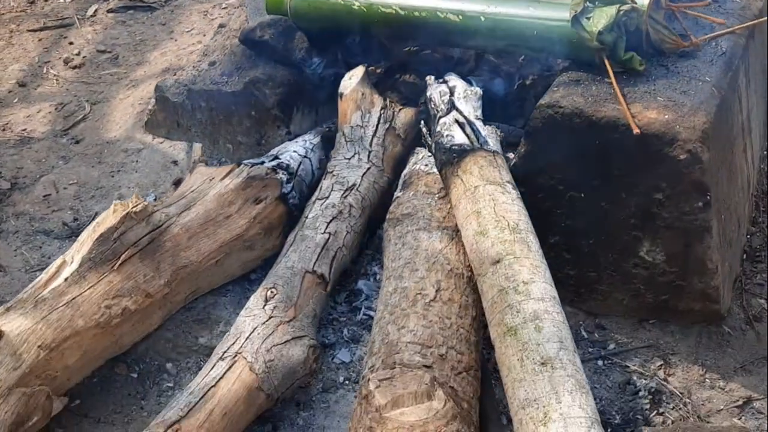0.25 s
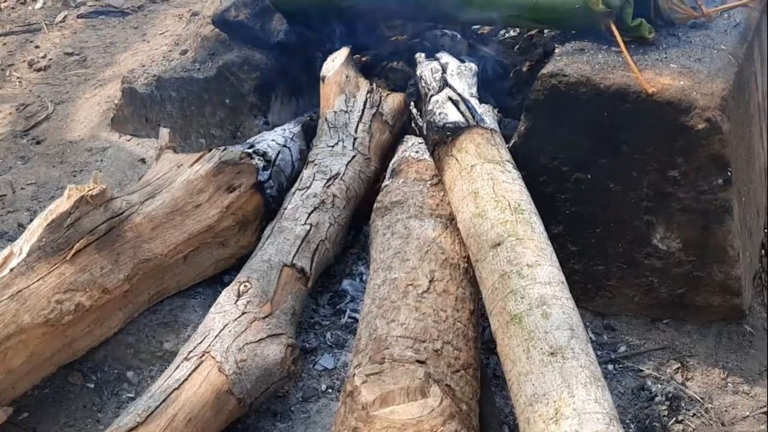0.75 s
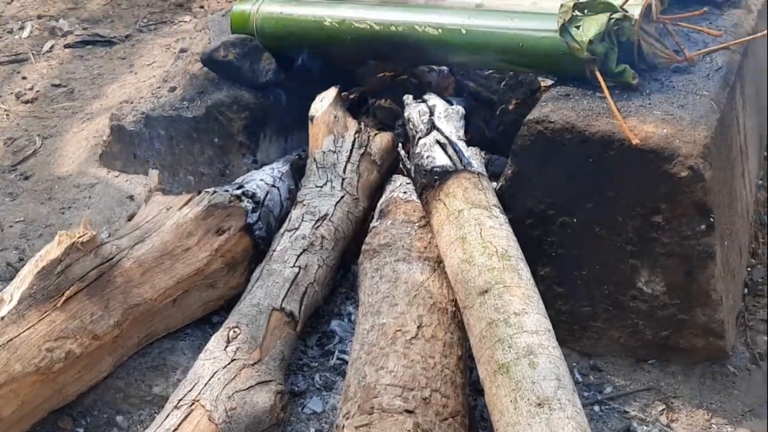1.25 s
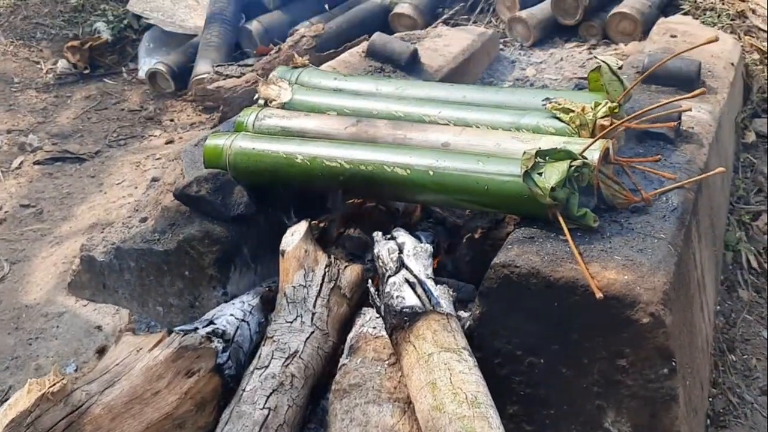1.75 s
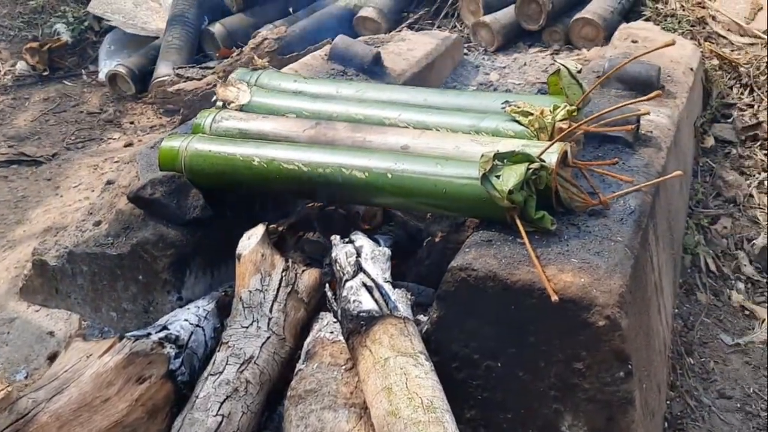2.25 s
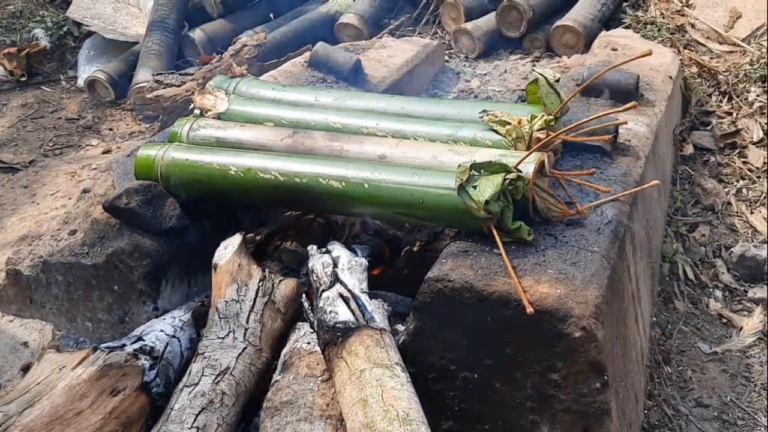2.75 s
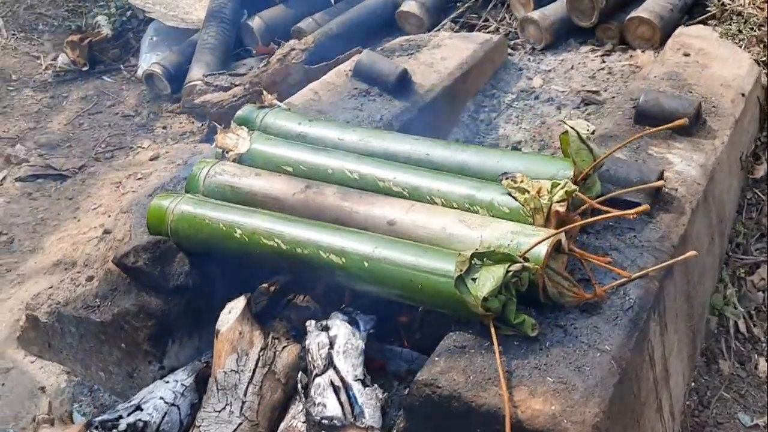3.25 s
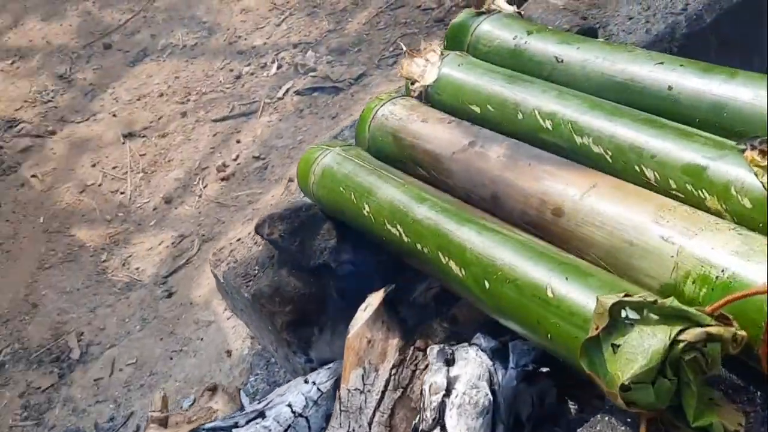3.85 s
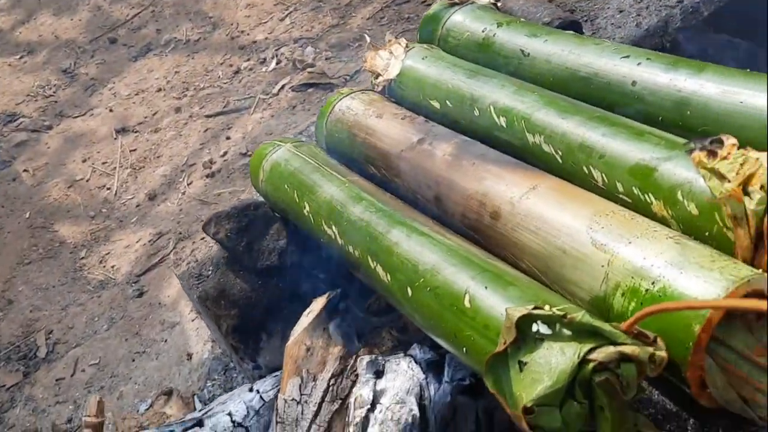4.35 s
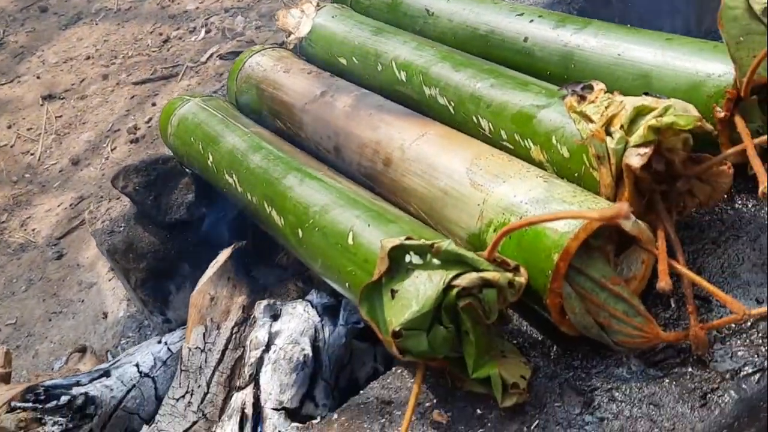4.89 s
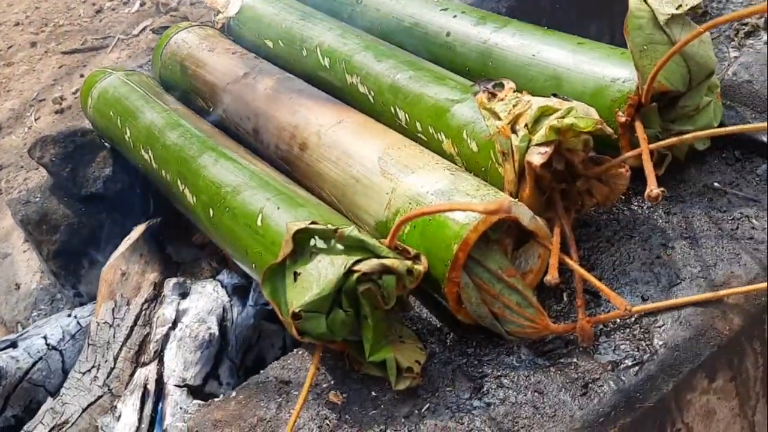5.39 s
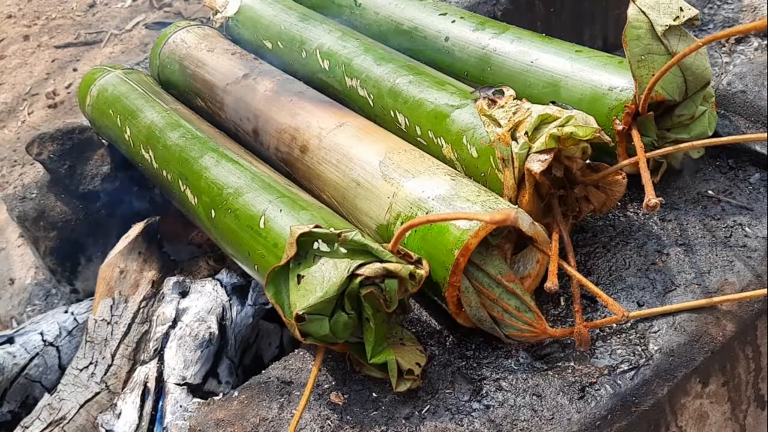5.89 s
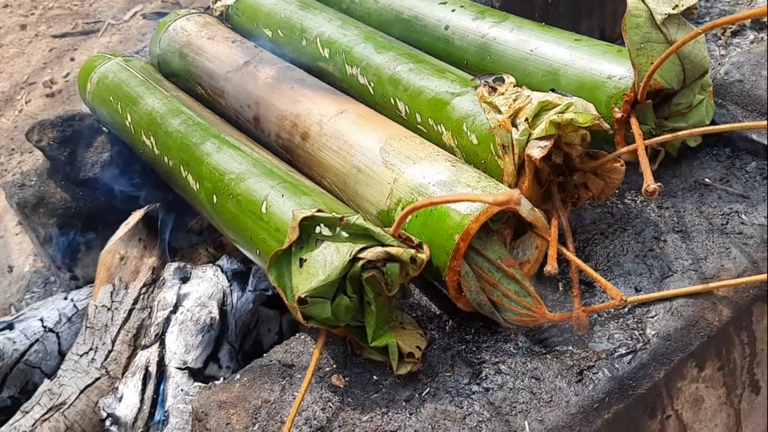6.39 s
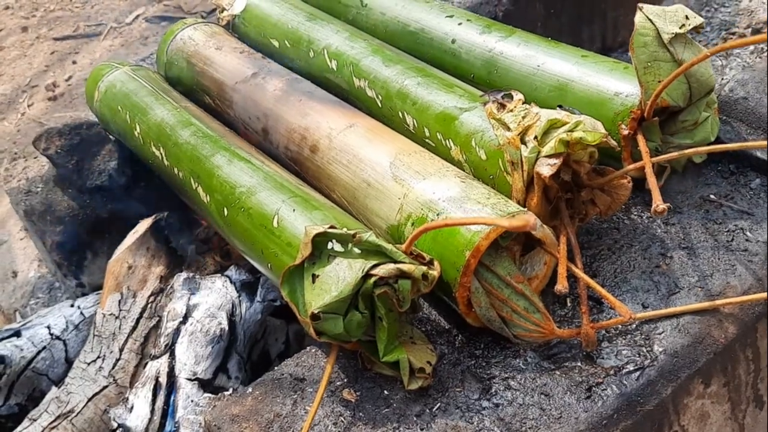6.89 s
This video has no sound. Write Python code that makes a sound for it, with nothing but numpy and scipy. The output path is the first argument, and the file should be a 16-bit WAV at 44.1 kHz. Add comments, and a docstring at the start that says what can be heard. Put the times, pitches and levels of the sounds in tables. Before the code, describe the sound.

Stuffed green bamboo tubes roast over a wood fire outdoors, heard through a hand-held stereo microphone. From the start, juice sizzles and a steam leak hisses, thin and high, a little weaker at first, spurting stronger around 0.6 s and 1.1 s. Low wind flutters bump the right side between 0.2 and 1.5 s, while a far engine chugs very faintly. Soft, nearly buried log pops come near 1.0, 1.9 and 2.6 s. Gusts return at 2.8 s and buffet the right hard around 3.0-3.2 s. A shoe scuffs and thuds dully on dirt at 3.2 s, then gives a sharper gritty knock, more to the left, at 3.4 s. As the microphone moves in, the hiss changes colour, the jet dipping around 4.3 s, then becomes broad, sputtering and steady. A faint hollow rush of flames swells near 5.5 s; the sizzle continues to the end at 7.1 s.

```python
"""Juice sizzles and steam hisses from a leak in stuffed green bamboo tubes, roasting over a wood fire outdoors.
The hand-held two-port microphone moves in close after three seconds, as a shoe scuffs and thuds on dirt.
Gusts buffet its right port, logs pop softly, flames rush and an engine chugs far away.
Hiss and rush are shaped noise, the gusts slow noise and single swings, the knocks and engine struck resonances,
and the pops, thuds and one far tone are shaped sines."""
import sys
import numpy as np
from scipy import signal
from scipy.fft import rfft, irfft
from scipy.io import wavfile
from scipy.ndimage import uniform_filter1d

SR = 44100
rng = np.random.default_rng(int(sys.argv[2]) if len(sys.argv) > 2 else 0)


def file_out(sig):
    """Save sig as 16-bit WAV at sys.argv[1]."""
    # one column per channel
    cols = np.atleast_2d(sig).T
    # limit, then scale
    lim = np.clip(cols, -1, 1)
    pcm = np.round(lim * 32767).astype(np.int16)
    wavfile.write(sys.argv[1], SR, pcm)


N = 314433
TIME = np.arange(N) / SR  # s
FRAME = 512  # samples per spectral frame of the hiss
PORT_GAP_M, SOUND_M_S = .14, 343

# In all tables the half length or width of a hump is where it has fallen to 1/e.

# place between two hiss colours, 0 as from a step away, 1 as close by; the opening, from higher
# and farther off, has a mixed colour: (time [s], closeness of colour [0-1])
CLOSENESS = [(0, .46), (.45, .11), (1.2, .06), (1.5, .01), (3.05, .01), (3.3, .45), (3.65, .6), (4, .73),
             (4.35, .87), (4.75, .97), (5.4, 1), (7.13, .98)]
# the tubes lie to the right as the microphone swings past: (time [s], bearing [degrees])
BEARING = [(0, 7.5), (.7, 6), (1.2, 4), (1.8, .5), (3.1, 0), (3.3, 9), (3.6, 14), (3.85, 24), (4.05, 25),
           (4.42, 23), (4.58, 11), (4.85, 6), (5.3, 1.5), (7.13, 2)]

# how strongly the juice sizzles: (time [s], relative level [dB])
SIZZLE = [(0, -10.5), (.15, -8), (.6, -2.5), (1.05, -2.5), (1.6, -.5), (3.15, -0.2), (3.35, -2.5),
          (3.75, -2.5), (4.15, 0), (7.13, -1)]
# basic hiss at each port, gliding with closeness:
# (far frequency [Hz], far density [dB per Hz], near frequency [Hz], near density [dB per Hz])
HISS_LEFT = [(900, -103.5, 850, -102), (1250, -100, 1250, -81), (1570, -84.5, 1550, -75.7),
             (1780, -87.5, 2200, -77.3), (2130, -97.5, 3100, -84.5), (2360, -86.3, 3800, -80),
             (3400, -85.5, 5100, -74.6), (4650, -89.8, 5900, -72.2), (5050, -92, 7150, -79),
             (6100, -76.5, 7550, -75.3), (7550, -66.6, 7950, -72), (8700, -88.5, 8900, -83),
             (11000, -94.9, 10600, -97.2), (12500, -80.4, 12800, -78.5), (14400, -87.7, 14700, -87.3),
             (15800, -85.6, 15800, -81.2)]
HISS_RIGHT = [(900, -103.8, 900, -101.9), (1330, -105.9, 1150, -97), (1850, -86, 1430, -85.3),
              (2450, -83.2, 2100, -81.8), (3600, -85.7, 3500, -81.7), (4400, -87.2, 4400, -82),
              (6400, -89, 6400, -81.8), (7700, -82.3, 7700, -80.5), (9400, -89.3, 9000, -81.1),
              (12000, -80.9, 12000, -78.4), (14000, -82.6, 14000, -79.2), (15800, -81.5, 15800, -82.3)]
# how alike the ports hear the hiss:
# (frequency [Hz], far likeness [0-1], near likeness [0-1], far lag of the left port [radians])
LIKENESS = [(1000, .6, .68, 0), (1380, .2, .7, .9), (1650, .65, .65, 1.1), (2000, .5, .62, 1.4),
            (2150, .2, .6, .6), (2450, .6, .68, 0), (3150, .68, .95, 0), (3550, .68, .78, 0),
            (3950, .68, .42, 0), (4400, .55, .28, .6), (4900, .4, .18, .5), (5100, .1, .17, -1.2),
            (5400, .4, .15, -1.7), (5800, .35, .12, -1.2), (6250, .4, .1, 1.2), (7500, .6, .1, 1.1),
            (9000, .25, .05, 1), (12000, .05, 0, 0)]
# the leak spurts or chokes for a moment:
# (time [s], half length [s], steam jet [dB], fine spray [dB], spray left minus right [dB])
SURGES = [(0.08, 0.14, 1.5, 0, -4), (0.28, 0.073, 0.5, -3.5, 2), (0.575, 0.24, 6, 3.5, -8),
          (1.104, 0.208, 2.5, -6.5, 0), (2.242, 0.1, 0, 5.5, 1), (3.11, 0.19, 0.2, -4.5, 2),
          (4.278, 0.28, -9.5, 3.5, 0.5)]
# pitch of the jet from a step away, its width, and the pitch above which the spray sounds
JET_FAR_HZ, JET_WIDTH_HZ, SPRAY_HZ = 7650, 800, 8800
# the jet blows a beam that the microphone crosses halfway in; place and width in closeness
BEAM_DB, BEAM_AT, BEAM_WIDTH = 4, 0.52, 0.37
SPRAY_FAR_DB, SPRAY_NEAR_DB, SPRAY_PAN_DB = -0.5, 0.75, 0.3
# colour of hiss arriving fully from the side: (frequency [Hz], left [dB], right [dB])
SIDE_ON = [(1000, 6, 3), (1350, 6.5, 3), (2060, 2.5, -3.5), (2620, 10, 6.5), (3430, 5.5, 5),
           (4600, -7.5, 1), (4960, -5, 3.5), (5700, -1, 4.5), (7440, -2, -0.5), (9500, 5.5, 1),
           (11000, 1.5, -1), (12860, -13, -2), (14530, 6, 3), (15700, -4, -15)]
SIDE_ON_DEGREES = 26.3
# an echo hollows one band at the left port, higher and wider from close by, once the bearing turns off ahead
LEFT_DIP_FAR_HZ, LEFT_DIP_NEAR_HZ = 5050, 7150
LEFT_DIP_FAR_WIDTH_HZ, LEFT_DIP_NEAR_WIDTH_HZ = 220, 400
LEFT_DIP_DB, LEFT_DIP_DEGREES = -5, 4.5
# a wider hollow at the right port slides with bearing:
# (frequency straight ahead [Hz], slide [Hz per degree], width [Hz], far level [dB])
RIGHT_DIP = (5948, -150, 902, -5.5)
# echoes off the hearth notch the right port: (frequency [Hz], width [Hz], far level [dB])
RIGHT_NOTCHES = [(1370, 110, -5), (2210, 110, -10), (2680, 120, -4.5), (3170, 120, -2), (4100, 110, -5),
                 (6150, 200, -2.5)]
# humps and hollows slide through the hiss, most of them while the microphone moves:
# (time [s], half length [s], frequency at that time [Hz], width [Hz], left [dB], right [dB])
SWEEPS = [(.07, .1, 1940, 170, 3.5, 6), (.07, .12, 2380, 300, 0, -7), (.3, .2, 1650, 170, 4, 0),
          (.3, .14, 1980, 150, -3, -5), (.28, .17, 2300, 200, 9, 3), (.12, .35, 3200, 700, -3, -1.5),
          (.15, .3, 5700, 1100, 1.5, 5), (.55, .55, 9900, 1000, 4.5, 3.5), (.55, .6, 12400, 900, -5, 0),
          (.6, .7, 14800, 700, 0, -6), (.95, .5, 5230, 200, -5, -2), (3.65, .35, 3800, 1200, -3, -1),
          (5.42, .25, 1850, 250, 2, 2), (6.03, .13, 2250, 300, 3, 3)]
SWEEP_OCTAVES_PER_S = -0.092

# gusts on the right port: (start [s], hold [s], level [dB])
GUSTS = [(0.097, 1.1, -51.5), (0.24, 0.073, -36.5), (0.572, 0.05, -38.5), (0.732, 0.014, -39.5),
         (.85, 0.028, -40), (1.09, .035, -32.5), (1.182, 0.069, -34.5), (1.414, 0.036, -40.5),
         (1.62, 0.021, -47), (2.83, 0.04, -36.5), (2.927, .04, -36), (3.005, 0.078, -23.5),
         (3.135, 0.071, -29.5), (3.25, 0.058, -35.5), (3.468, 0.037, -51), (3.591, .06, -50),
         (5.095, 0.017, -55), (5.635, 0.017, -56), (6.487, 0.073, -53.5)]
GUST_RISE_DB_PER_S, GUST_FALL_DB_PER_S, BREEZE_DB = 279, 253, -76
# spectral shape of turbulence at the port: (frequency [Hz], relative density [dB])
TURBULENCE = [(25, -47), (42, 4), (65, 0), (100, -0.5), (150, -13), (240, -19.5), (350, -37), (520, -51.5),
              (900, -73), (2000, -89.5)]
# single eddies that strike the port: (time [s], approximate peak [dB], pitch [Hz])
EDDIES = [(0.256, -41, 102), (0.3, -31.5, 96), (0.617, -33, 94), (0.734, -49, 84), (1.12, -26.5, 84),
          (1.195, -26.5, 111), (2.866, -23.5, 74), (2.99, -19.5, 75), (3.033, -20.5, 85), (3.058, -12, 91),
          (3.147, -16.5, 85), (3.216, -28, 125), (3.305, -35, 92.2), (3.49, -50, 70.1), (3.62, -50, 68.7),
          (5.342, -49, 60), (5.428, -43.5, 59.7), (6.481, -49, 59.8)]

# a shoe scrapes gritty dirt, before the ground rings:
# (time [s], level [dB], 60 dB decay [s], lowest pitch woken [Hz], left minus right [dB])
STEPS = [(3.178, -33, .07, 1100, -1), (3.19, -37, .04, 1100, -1), (3.211, -39, .14, 1400, 1),
         (3.359, -44, .1, 620, 4.5), (3.372, -44.5, .05, 620, 4), (3.4095, -35.5, .06, 580, 9),
         (3.421, -37.5, .08, 580, 5), (3.433, -37.5, .055, 750, 5)]
# the shoe strikes hard spots: (time [s], strength [dB], lowest pitch woken [Hz], left minus right [dB])
KNOCKS = [(3.179, -17, 1100, -1), (3.191, -16, 1100, 0), (3.222, -23, 1400, 1), (3.363, -28, 620, 5),
          (3.374, -25, 620, 4), (3.411, -18, 580, 11), (3.4152, -11.5, 580, 9), (3.4182, -5, 580, 9),
          (3.43, -22, 580, 6), (3.438, -18, 750, 5)]
# ringing of ground and sole: (frequency [Hz], width [Hz], gain [dB])
DIRT = [(790, 70, 8), (965, 70, 4), (1345, 130, -1), (1720, 340, 2), (2080, 360, 2), (3150, 250, -5)]
# the weight coming down:
# (time [s], level before the onset is softened [dB], pitch [Hz], 60 dB decay [s], left minus right [dB])
THUDS = [(3.177, -49.5, 469, 0.14, 2), (3.177, -40, 260, 0.081, 2), (3.196, -32.5, 253, 0.12, 2),
         (3.419, -55, 468, 0.037, 1), (3.42, -36, 251, 0.025, 2.5)]

# soft pops in the logs: (time [s], level before the onset is softened [dB], pitch [Hz])
POPS = [(.996, -51.5, 550), (1.869, -54.5, 565), (2.56, -51, 250)]
# what a log rings with: (multiple of the pitch, relative level [dB])
LOG_MODES = [(1, 0), (1.45, -9), (1.8, -7)]
POP_T60_S = .026

# the distant engine labours and eases off: (time [s], level [dB], firings per second [Hz])
ENGINE = [(0, -63.5, 26.3), (.45, -57.5, 28), (.85, -57, 28.5), (1, -63, 25), (1.25, -60, 22.7),
          (1.6, -75, 22.4), (2, -63, 26), (2.25, -64, 27.7), (2.7, -66.5, 25.6), (3.4, -62, 27),
          (4.1, -77, 24.4), (4.5, -71, 27.5), (5, -75, 22.6), (5.8, -69.5, 22.8), (6.35, -65.5, 25.8),
          (7.13, -71.5, 25.3)]
# its exhaust resonances: (frequency [Hz], width [Hz], gain [dB])
EXHAUST = [(76.4, 42, 11.5), (124, 21, 3)]
FIRING_SCATTER_DB = 1.2
# a faint low tone far away: (time [s], half length [s], frequency [Hz], peak level [dB])
FAR_TONE = (4.49, .13, 287.5, -69)

# basic spectrum of open air and flames: (frequency [Hz], density [dB per Hz])
AIR = [(20, -100), (45, -79.5), (80, -85.5), (150, -91), (270, -92), (380, -101), (520, -101), (800, -104),
       (1400, -114), (4000, -135)]
# offsets of that rush at closeness 0 and 1
RUSH_FAR_DB, RUSH_NEAR_DB = -5, -3
# the flames flare up once with a hollow rush:
# (time [s], half length [s], frequency [Hz], width [Hz], level [dB])
FLARE = (5.5, 0.42, 500, 220, -71.5)

LOW_CUT_HZ, TOP_HZ = 45, 15850


def hiss(sputter_db=0.38, surge_db=0.5, jet_sputter_db=1.4, jet_surge_db=0.3, jet_rise_hz=250, jet_right=0.98):
    """Sizzling juice and a sputtering steam jet, coloured by the way to each port."""
    f, t, grains = signal.stft(np.array([boiling() for _ in range(3)]), SR, nperseg=FRAME)
    f = np.maximum(f, 1)
    f_column = f[:, None]
    near, = curves(CLOSENESS, t)
    level_db, = curves(SIZZLE, t)
    bearing, = curves(BEARING, t)
    jet_db, spray_db, spray_pan_db = leak(t, near)
    left, right = port_grains(grains, f, near, bearing)

    # the jet sounds a little higher from close by
    jet = bump(f_column, JET_FAR_HZ + jet_rise_hz * near, JET_WIDTH_HZ)
    spray = 1 / (1 + (SPRAY_HZ / f_column) ** 6)
    # droplets keep choking the jet; close by, many other wet spots even it out
    choke_db = np.interp(t, TIME, jet_sputter_db * walk(110) + jet_surge_db * walk(25.0))
    choke_db = choke_db * (1 - .5 * near)
    spots_db = wet_spots(f_column, t)
    path_dbs = np.add(side_on(f, bearing), reflections(f, near, bearing)) + sweeps(f, t)

    # the right port loses the jet's changes in level as closeness grows
    ports = [(left, HISS_LEFT, .5, 1), (right, HISS_RIGHT, -.5, jet_right * (1 - near))]
    out = []
    for (grain, table, side, facing), path_db in zip(ports, path_dbs):
        db = hiss_spectrum(table, f, near) + path_db + level_db + spots_db
        db = db + jet * (facing * jet_db + choke_db)
        db = db + spray * (spray_db + side * spray_pan_db + .5 * choke_db)
        out.append(signal.istft(grain * amp(db), SR, nperseg=FRAME)[1][:N])
    sputter = amp(sputter_db * walk(250) + surge_db * walk(24.98))
    return np.array(out) * np.sqrt(SR / 2) * sputter


def boiling(rate=2500, grain_db=-9, scatter_db=4.0):
    """Rushing vapour with countless tiny bubbles bursting at random (rate per s); flat spectrum, rms 1."""
    bursting = rng.random(N) < rate / SR
    strength_db = scatter_db * np.minimum(rng.exponential(size=N), 5)
    bursts = bursting * rng.choice([-1, 1], N) * amp(strength_db)
    return unit(rng.standard_normal(N) + amp(grain_db) * unit(bursts))


def leak(t, near):
    """Level of the steam jet, level of the spray and its left minus right, in dB, as the leak spurts."""
    jet_db = BEAM_DB * np.exp(-((near - BEAM_AT) / BEAM_WIDTH) ** 4)
    spray_db = SPRAY_FAR_DB + near * (SPRAY_NEAR_DB - SPRAY_FAR_DB)
    surges = sum(np.outer(dbs, bump(t, s, length)) for s, length, *dbs in SURGES)
    return jet_db + surges[0], spray_db + surges[1], SPRAY_PAN_DB + surges[2]


def port_grains(grains, f, near, bearing):
    """Likeness of the ports varies with pitch and closeness; the farther port hears the hiss later."""
    far_likeness, near_likeness, far_lag = curves(LIKENESS, f)
    away = (1 - near) ** 2
    likeness = np.outer(far_likeness, away) + np.outer(near_likeness, 1 - away)
    left, right = two_ports(grains, likeness)
    delay = PORT_GAP_M / SOUND_M_S * np.sin(np.radians(bearing))  # s
    lag = 2 * np.pi * np.outer(f, delay) + np.outer(far_lag, away)  # radians
    return left * np.exp(-1j * lag), right


def wet_spots(f_column, t, flicker_db=1.06, width=0.077):
    """Wet spots of different pitch flare up and dry out on their own; returns dB."""
    return sum(flicker_db * np.interp(t, TIME, walk(14)) * bump(np.log(f_column / hz), 0, width)
               for hz in np.geomspace(1400, 6000, num=9))


def hiss_spectrum(table, f, near, bass_slope_db=22):
    """Basic hiss at a port in dB per Hz, its humps gliding with closeness; falls per decade below the table."""
    far_points, near_points = np.array(table)[:, :2], np.array(table)[:, 2:]
    frames = []
    for n in near:
        hz, db = (far_points + n * (near_points - far_points)).T
        bass_db = bass_slope_db * np.minimum(np.log10(f / hz[0]), 0)
        frames.append(np.interp(np.log(f), np.log(hz), db) + bass_db)
    return np.transpose(frames)


def side_on(f, bearing):
    """Colour in dB at each port, growing as the microphone turns away from the tubes."""
    hz, *ports = np.transpose(SIDE_ON)
    turned = 1 - bump(bearing, 0, SIDE_ON_DEGREES)
    return [np.outer(np.interp(np.log(f), np.log(hz), db), turned) for db in ports]


def reflections(f, near, bearing):
    """Dips in dB that echoes off the hearth cut into the hiss at each port."""
    f = f[:, None]
    turned = 1 - bump(bearing, 0, LEFT_DIP_DEGREES)
    left_hz = LEFT_DIP_FAR_HZ + near * (LEFT_DIP_NEAR_HZ - LEFT_DIP_FAR_HZ)
    left_width = LEFT_DIP_FAR_WIDTH_HZ + near * (LEFT_DIP_NEAR_WIDTH_HZ - LEFT_DIP_FAR_WIDTH_HZ)
    left = LEFT_DIP_DB * turned * bump(f, left_hz, left_width)
    ahead_hz, hz_per_degree, width, right_db = RIGHT_DIP
    hollow = right_db * bump(f, ahead_hz + hz_per_degree * bearing, width)
    notches = sum(db * bump(f, hz, notch_width) for hz, notch_width, db in RIGHT_NOTCHES)
    return left, (hollow + notches) * (1 - near) ** 2


def sweeps(f, t):
    """Passing colour in dB at each port; every band sinks slowly in pitch."""
    total = 0
    for s, length, hz, width, *dbs in SWEEPS:
        band_hz = hz * 2 ** (SWEEP_OCTAVES_PER_S * (t - s))
        band = bump(t, s, length) * bump(f[:, None], band_hz, width)
        total = total + np.multiply.outer(dbs, band)
    return total


def wind(split_hz=160, calm_db=-9, gust_db=1, left_db=-38):
    """Turbulence on the right port, faint on the left; stronger gusts shed smaller, higher eddies."""
    level_db = gusts()
    swirl = unit(colour(rng.standard_normal(N), TURBULENCE))
    # even out the swirl so that the gust sets its strength
    swirl = swirl / np.sqrt(uniform_filter1d(swirl ** 2, SR // 20) + 0.02)
    # filtering forwards and backwards keeps the large eddies in step with the rest
    large = cut(cut(swirl, split_hz, "low")[::-1], split_hz, "low")[::-1]
    small = swirl - large
    calm = np.clip((level_db.max() - level_db) / 20, 0, 2)
    flow = (large + amp(calm_db * calm) * small) * amp(level_db + gust_db * walk(27.15))
    for s, db, hz in EDDIES:
        # a passing eddy swings the pressure down, then up
        turn = 2 * np.pi * hz * (TIME - s)
        flow = flow + amp(db) * 2 * turn / (1 + turn ** 2 / 7) ** 5
    return np.array([amp(left_db) * flow, flow])


def gusts():
    """Strength of the wind in dB: each gust rises, holds and dies away over a faint breeze."""
    power = amp(BREEZE_DB) ** 2
    for s, hold, db in GUSTS:
        early, late = np.maximum(s - TIME, 0), np.maximum(TIME - s - hold, 0)
        drop_db = np.minimum(GUST_RISE_DB_PER_S * early + GUST_FALL_DB_PER_S * late, 120)
        power = power + amp(db - drop_db) ** 2
    return 10 * np.log10(power)


def footfall(grit_top_hz=3400, likeness=0.97, tick_db=-37, grain_rate=900):
    """A shoe scrapes and knocks on grit, ringing ground and sole, while its weight lands in dull thuds."""
    noises = [boiling(grain_rate, grain_db=1, scatter_db=2.5) for _ in range(3)]
    grit = two_ports(np.array(noises), likeness)
    knocks = [(amp(db) * pan(pan_db) * signal.unit_impulse(N, int(s * SR)), hz)
              for s, db, hz, pan_db in KNOCKS]
    scrapes = [(amp(db) * pan(pan_db) * fade(s, t60) * grit, hz) for s, db, t60, hz, pan_db in STEPS]
    # a light touch wakes only the upper resonances; the tiny offset keeps the filter off exact silence
    crunch = sum(cut(push + 1e-18, hz, "high", order=3) for push, hz in knocks + scrapes)
    ticks = amp(tick_db) * sum(push for push, hz in knocks)
    out = cut(ring(crunch, DIRT), grit_top_hz, "low", order=4) + ticks
    for s, db, hz, t60, pan_db in THUDS:
        # the soil gives way more slowly than the grit on top of it
        swell = cut(fade(s, t60), 250, "low")
        out = out + amp(db) * pan(pan_db) * swell * np.sin(2 * np.pi * hz * (TIME - s))
    return out


def pops():
    """Gas pockets burst deep in the logs and ring the wood briefly; the deeper the pitch, the softer the onset."""
    out = np.zeros(N)
    for s, db, hz in POPS:
        burst = amp(db) * cut(fade(s, POP_T60_S), hz / 2, "low")
        for multiple, mode_db in LOG_MODES:
            out = out + burst * amp(mode_db) * np.sin(2 * np.pi * multiple * hz * (TIME - s))
    return out


def engine(top_hz=146, low_hz=58, pan_db=3.5):
    """Regular firings of wandering strength ring an exhaust; only the bass carries this far."""
    level_db, firing_hz = curves(ENGINE, TIME)
    # one impulse each time the running count of firings passes a whole number
    firings = np.diff(np.floor(np.cumsum(firing_hz) / SR), prepend=0)
    firings = firings * amp(FIRING_SCATTER_DB * walk(30))
    bass = cut(ring(firings, EXHAUST), top_hz, "low", order=12)
    chug = unit(cut(bass, low_hz, "high"))
    return chug * amp(level_db) * pan(pan_db)


def far_tone():
    """One soft tone of steady pitch swells and fades in the distance."""
    s, length, hz, db = FAR_TONE
    return amp(db) * bump(TIME, s, length) * np.sin(2 * np.pi * hz * TIME)


def air(likeness=0.45, pan_db=3, swell_db=1):
    """The soft noise of flames and open air, rising with closeness, with one resonant flare."""
    noise = two_ports(rng.standard_normal((3, N)), likeness)
    near, = curves(CLOSENESS, TIME)
    rush = colour(noise, AIR) * amp(RUSH_FAR_DB + near * (RUSH_NEAR_DB - RUSH_FAR_DB))
    s, length, hz, width, flare_db = FLARE
    flare = amp(flare_db) * bump(TIME, s, length) * unit(ring(noise, [(hz, width, 0)]))
    return (rush + flare) * pan(pan_db) * amp(swell_db * walk(9.6))


def amp(db):
    """Decibels to gain."""
    return 10 ** (np.asarray(db) / 20)


def unit(x):
    """Scale to rms 1."""
    return x / np.sqrt(np.mean(x ** 2))


def curves(table, x):
    """The later columns of a table, read at values x of its first column."""
    points, *columns = np.transpose(table)
    return [np.interp(x, points, c) for c in columns]


def bump(x, centre, width):
    """A smooth hump of height 1."""
    return np.exp(-((x - centre) / width) ** 2)


def walk(rate):
    """Smooth random wander with spread 1, heading for a new value rate times per s."""
    k = max(int(SR / rate), 2)
    steps = np.repeat(rng.standard_normal(N // k + 1), k)
    return unit(uniform_filter1d(steps, k)[:N])


def fade(start, t60):
    """Envelope of a blow: sudden rise, exponential fall by 60 dB in t60 seconds."""
    age = TIME - start
    return (age >= 0) * np.exp(-np.log(1000) * np.maximum(age, 0) / t60)


def pan(db):
    """Gains of the two ports for a left minus right level."""
    return amp(np.array([[db], [-db]]) / 2)


def two_ports(noises, likeness):
    """Mix one shared and two separate noises to a left-right pair."""
    likeness = np.clip(likeness, 0, 1)
    return np.sqrt(likeness) * noises[0] + np.sqrt(1 - likeness) * noises[1:]


def colour(noise, points):
    """Give white noise a spectrum of (frequency [Hz], density [dB per Hz]) points."""
    f = np.maximum(np.fft.rfftfreq(N, 1 / SR), 1)
    hz, db = np.transpose(points)
    gain = amp(np.interp(np.log(f), np.log(hz), db))
    return irfft(rfft(noise) * gain, N) * np.sqrt(SR / 2)


def ring(x, modes):
    """Sum of resonances (frequency [Hz], width [Hz], gain [dB])."""
    return sum(amp(db) * signal.lfilter(*signal.iirpeak(hz, hz / width, fs=SR), x) for hz, width, db in modes)


def cut(x, hz, kind, order=2):
    """Low-pass or high-pass."""
    return signal.sosfilt(signal.butter(order, hz, kind, fs=SR, output="sos"), x)


def scene():
    """All sounds together: hiss, wind, footfall, pops, engine, far tone, flames and air."""
    return hiss() + wind() + footfall() + pops() + engine() + far_tone() + air()


def record(dry):
    """The microphone chain rolls off the deepest rumble and cuts the top steeply."""
    f = np.fft.rfftfreq(N, 1 / SR)
    top = np.clip((TOP_HZ - f) / 200 + .5, 0, 1)
    bottom = 1 / np.sqrt(1 + (LOW_CUT_HZ / np.maximum(f, 1)) ** 8)
    return irfft(rfft(dry) * top * bottom, N)


dry = scene()
out = record(dry)
file_out(out)
```